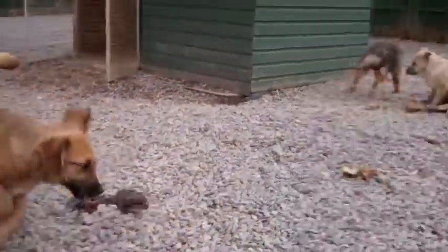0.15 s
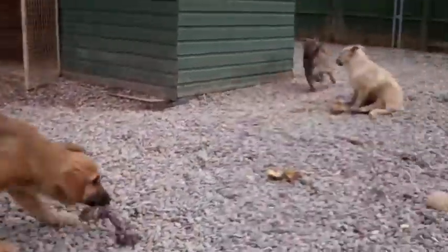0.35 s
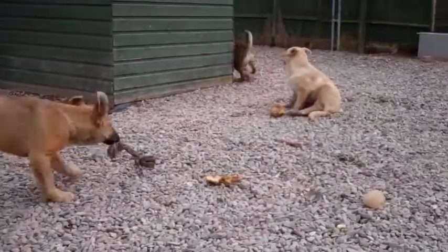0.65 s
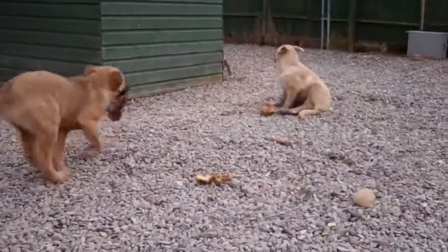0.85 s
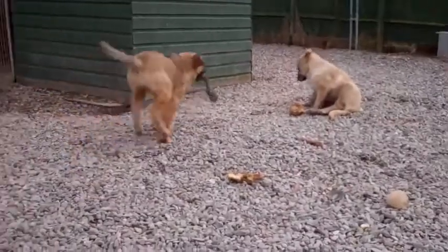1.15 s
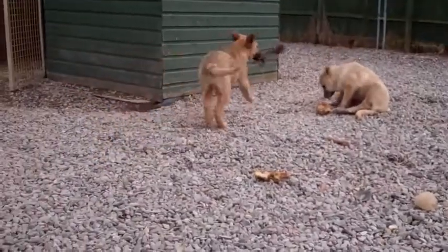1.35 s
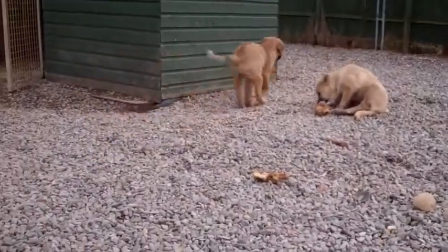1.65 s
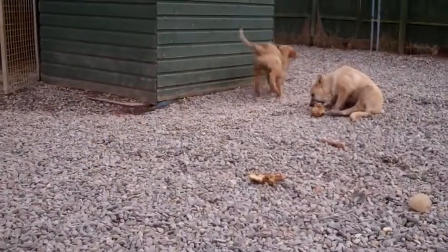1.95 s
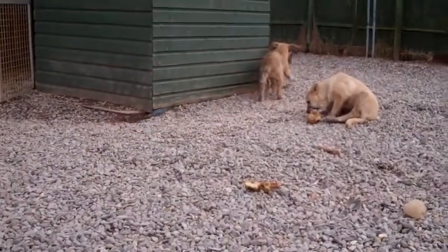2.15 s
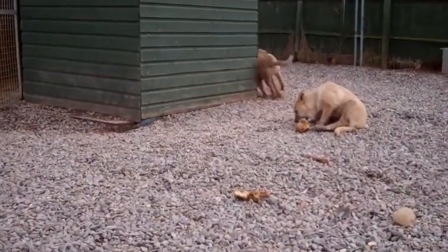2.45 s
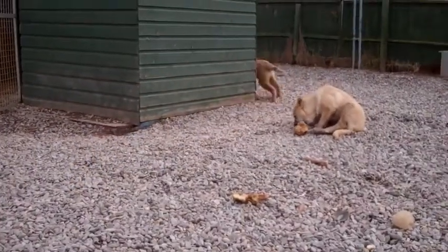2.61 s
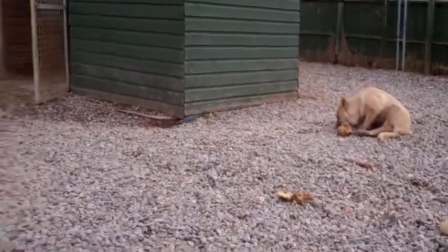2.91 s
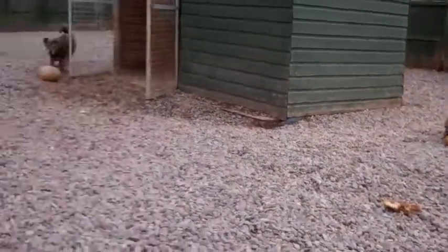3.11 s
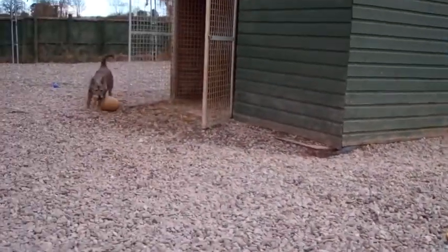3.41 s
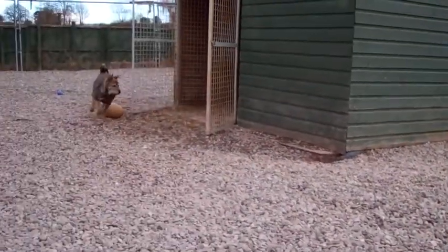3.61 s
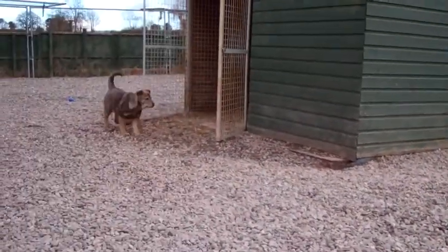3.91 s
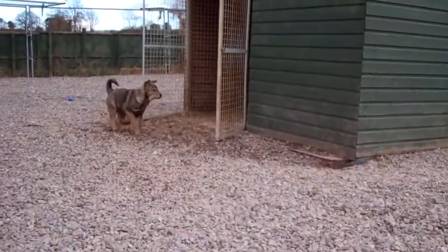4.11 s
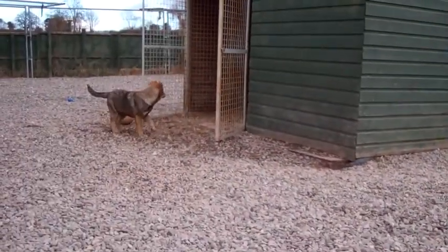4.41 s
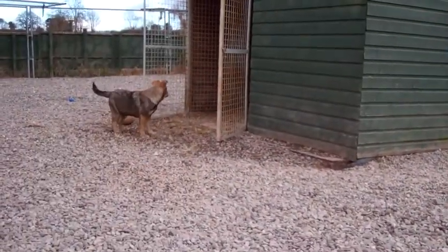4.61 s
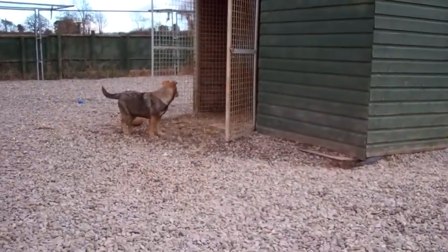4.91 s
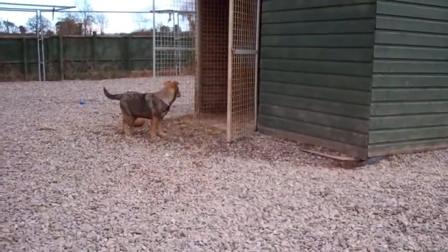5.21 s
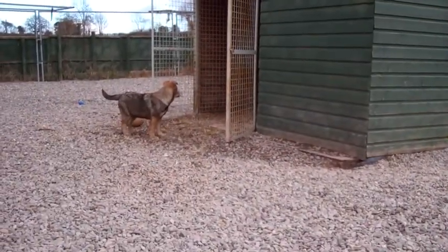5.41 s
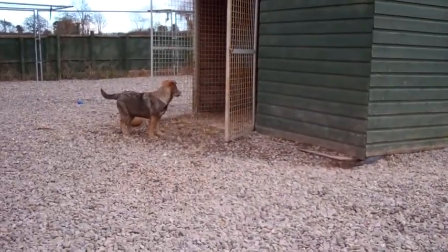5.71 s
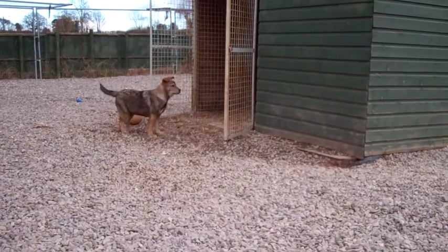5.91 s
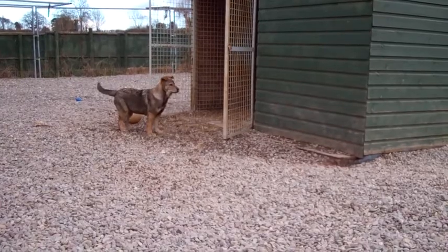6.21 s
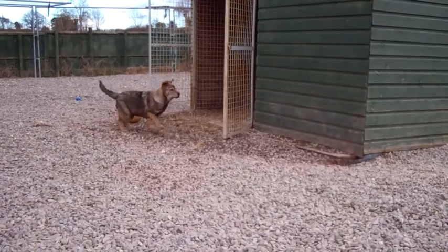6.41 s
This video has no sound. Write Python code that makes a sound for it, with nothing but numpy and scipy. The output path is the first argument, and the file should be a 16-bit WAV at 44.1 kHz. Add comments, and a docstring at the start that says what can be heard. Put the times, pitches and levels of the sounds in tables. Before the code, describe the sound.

Outdoor stereo microphone in a kennel yard: irregular light paw crunches on loose stones with crisp pebble clicks, densest just before four seconds. Then the gravel settles to faint shuffling and a puppy's thin, piercing whistle-like whines come forward, broken by a single loud yelp, small closed-mouth whimpers and cracked squeaks. Soft knocks near the shed, slight wall reflections and a low distant hush. A couple of paw steps return at the end.

```python
"""A fenced kennel yard on gravel: puppies trot and scuffle; each paw crunches the stones and flicks a few loose.
Then, off to one side, one pup whines in thin nasal whistles, with a yelp, short whimpers and broken squeaks.
Shed and fence answer the voice; a few dull bumps and a quiet outdoor hush lie underneath.
Stones are noise and short decaying ticks; the voice is sines, with resonances and a rush of air for the yelp.
"""
import sys
import numpy as np
from scipy import signal
from scipy.fft import rfft, irfft, next_fast_len
from scipy.io import wavfile
from scipy.ndimage import map_coordinates

SR = 44100
rng = np.random.default_rng(int(sys.argv[2]) if len(sys.argv) > 2 else 0)


def output_pcm(signal):
    """Save a mono or channel-first signal as 16-bit PCM at the path in sys.argv[1].

    Samples are clipped to [-1, 1] before scaling.
    """
    pcm = np.clip(np.atleast_2d(signal).T, -1, 1) * 32767
    wavfile.write(sys.argv[1], SR, np.round(pcm).astype(np.int16))


N = 288855
T = np.arange(N) / SR

# Outdoor background before the trim below: time_s [s], level_db [dB]
HUSH_LEVEL = [(0.12, -75.5), (0.92, -78), (1.11, -70), (1.75, -66.5), (1.8, -75), (1.89, -75.5),
              (1.95, -68), (3.69, -65), (4.76, -68.5), (5.08, -64), (6.5, -66)]
# Colour of the distant rumble and air: frequency_hz [Hz], density_db [dB per Hz]
HUSH_COLOUR = [(15, -19), (25, -10.5), (59, -1), (124, -10), (417, -7.5), (728, -9.5), (818, -8),
               (1050, -9.5), (1160, -10.5), (1980, -9.5), (2500, -13.5), (3250, -12), (5500, -120)]
# Dull knocks: start_s [s], level_db [dB], centre_hz [Hz], length_s [s]
KNOCKS = [(1.373, -35, 2070, 0.0062), (1.374, -46, 755, 0.0066), (1.833, -55, 1750, 0.02),
          (3.212, -50.5, 292, 0.011), (3.252, -55, 290, 0.012), (3.346, -61, 290, 0.044),
          (3.497, -57.5, 285, 0.068), (3.553, -55, 96, 0.072), (4.009, -47.5, 720, 0.02),
          (4.89, -54, 84.4, 0.12), (4.914, -55, 208, 0.037), (4.982, -58, 143, 0.17),
          (5.331, -47.5, 356, 0.051), (5.402, -56.5, 363, 0.072), (5.614, -65, 140, 0.076)]
# Firmer paw falls: start_s [s], level_db [dB], length_s [s], rise_s [s]
PAW_FALLS = [(.002, -44.5, 0.034, 0.0019), (.146, -46.5, 0.065, 0.0066), (0.318, -45.5, .019, 0.0035),
             (.358, -42.5, 0.031, 0.0031), (0.44, -50, 0.061, .008), (0.518, -48, 0.075, .003),
             (0.656, -48.5, 0.042, 0.0047), (0.724, -47.5, 0.023, 0.0032), (0.908, -44.5, 0.11, 0.0035),
             (1.03, -46, 0.052, 0.0047), (1.117, -45, 0.044, 0.0063), (1.292, -38.5, 0.054, .012),
             (1.427, -42.5, 0.051, .005), (1.528, -44, .045, 0.0037), (1.6, -49.5, .056, 0.007),
             (1.684, -39, 0.056, 0.024), (1.721, -35.5, 0.044, .006), (1.823, -47.5, 0.045, 0.0054),
             (1.933, -46.5, 0.1, 0.0042), (2.057, -44.5, 0.032, 0.0017), (2.135, -49.5, .13, 0.0022),
             (2.257, -42, 0.076, 0.007), (2.521, -46, 0.09, .005), (2.554, -39.5, 0.06, 0.014),
             (2.665, -49.5, 0.081, .003), (2.891, -48, 0.13, 0.0034), (3.138, -43, 0.039, 0.0044),
             (3.301, -48, 0.075, 0.0044), (3.373, -40.5, 0.063, .016), (3.455, -44, 0.11, .006),
             (3.563, -42, 0.089, 0.0081), (3.7, -45.5, 0.094, 0.011), (3.781, -37.5, 0.14, 0.021),
             (3.851, -39, 0.051, 0.0051), (3.891, -37, 0.047, 0.013), (4.084, -41, 0.034, 0.0066),
             (4.12, -39.5, 0.021, 0.0043), (4.19, -44, .016, 0.0043), (4.24, -41.5, .081, 0.0044),
             (5.895, -48, 0.031, 0.0058), (6.422, -46, 0.11, 0.013), (6.48, -45, .25, 0.013)]
# Light shuffling all over the yard: time_s [s], level_db [dB]
SHUFFLE_LEVEL = [(0.05, -52.5), (0.43, -52), (0.79, -58.5), (0.97, -60.5), (1.11, -54), (2.11, -58),
                 (3.0, -56.5), (3.75, -54.5), (3.93, -67), (4.22, -51), (4.33, -54.5), (4.61, -59),
                 (5.15, -58), (6.5, -54)]
# The packed layer sounds more where the loose cover is thin: time_s [s], gain_db [dB]
THIN_COVER_GAIN = [(0, -8.5), (.9, -9.5), (1.4, -5), (1.8, -21), (2.9, -39), (3.5, -5), (3.85, -5.5),
                   (4.1, -8.5), (6.5, -5)]
# Colour given to loose stones: frequency_hz [Hz], gain_db [dB]
LOOSE_COLOUR = [(880, -17.5), (1500, -10.5), (2040, -6.5), (2220, -5.5), (2830, -4), (3260, -4.5),
                (3550, -1.5), (5110, -2), (8630, 0.5), (9380, -3.5), (13000, -26), (14000, -40)]
# Colour given to packed stones below: frequency_hz [Hz], gain_db [dB]
PACKED_COLOUR = [(150, -34), (500, -5.5), (1200, -4), (2000, -8.5), (3200, -4), (6000, -25)]
# Lean of the gravel to the left: frequency_hz [Hz], left_minus_right_db [dB]
GRAVEL_LEAN = [(1500, 3), (4000, 2), (7400, 9), (10000, 10.5), (13000, -4)]
# Left-right likeness of the gravel: frequency_hz [Hz], likeness [0..1]
GRAVEL_LIKENESS = [(1300, 1), (3000, 0.69), (6000, 0.086), (12000, 0.12)]
# Loudest single stones: start_s [s], level_db [dB, first instant at the left], pitch_hz [Hz], t60_s [s]
LOUD_STONES = [(.089, -39, 9000, .012), (.182, -32.5, 8400, .008), (.296, -41, 8000, .006),
               (.316, -37, 7500, .015), (.362, -34, 9300, .02), (.378, -32.5, 8500, .025),
               (.427, -41, 7150, .008), (.511, -35, 8700, .025), (.563, -36, 9200, .014),
               (.666, -32, 7100, .016), (.917, -34.5, 7400, .025), (.992, -41, 7500, .012),
               (1.025, -35, 7200, .012), (1.080, -33, 8900, .009), (1.108, -40, 8450, .007),
               (1.302, -36, 6700, .015), (1.375, -30, 8000, .013), (1.526, -29.5, 6100, .01),
               (1.647, -40, 8000, .008), (1.726, -30, 4500, .012), (1.743, -27.5, 7300, .035),
               (1.819, -37.5, 8900, .01), (1.840, -37, 8000, .008), (1.939, -38, 7500, .016),
               (2.001, -40, 8000, .012), (2.056, -36, 8000, .014), (2.072, -36, 7000, .014),
               (2.135, -35, 7200, .01), (2.393, -28.5, 7800, .012), (2.476, -42, 7850, .014),
               (2.521, -39, 8000, .01), (2.667, -37, 8800, .012), (2.895, -41, 8300, .012),
               (3.515, -36, 9100, .012), (3.864, -31, 7500, .04), (3.929, -31.5, 9000, .035),
               (4.248, -31.5, 7800, .02), (4.307, -38, 8300, .02), (4.411, -42, 8300, .007),
               (4.946, -43, 9000, .012), (5.663, -43, 7000, .009), (6.065, -43, 5000, .005),
               (6.105, -41, 6000, .007), (6.167, -37.5, 6900, .004)]
# Nasal whistles, one course each: time_s [s], pitch_hz [Hz], level_db [dB], octave_db [dB]
WHINE_COURSES = [
    [(3.99, 4330, -47, -68), (4.02, 4340, -44, -66), (4.085, 4330, -46, -62), (4.13, 4345, -46, -59),
     (4.185, 4330, -50, -62)],
    [(4.66, 4010, -59, -62), (4.735, 4160, -58, -53), (4.77, 4180, -60, -62)],
    [(5.06, 3860, -52, -53), (5.085, 3990, -46, -62), (5.118, 3980, -50, -60)],
    [(5.122, 4290, -50, -51), (5.135, 4235, -42.5, -40), (5.165, 4120, -49, -50), (5.19, 4060, -52, -51),
     (5.255, 4005, -51, -54), (5.3, 4068, -51, -45), (5.33, 4072, -51, -44), (5.36, 4070, -52, -48),
     (5.382, 3920, -54, -50), (5.398, 3450, -70, -52)],
    [(5.592, 3800, -51, -66), (5.63, 3890, -41.5, -47), (5.67, 3990, -45, -55), (5.735, 4090, -42, -49),
     (5.78, 4110, -44.5, -49), (5.825, 4107, -52, -55), (5.87, 4104, -43, -53), (5.94, 4080, -46, -58),
     (5.98, 4050, -49, -60), (6.0, 3800, -62, -58)],
    [(6.21, 3740, -48, -62), (6.23, 3790, -41, -56), (6.277, 3950, -46, -59), (6.286, 4015, -36, -53),
     (6.33, 4005, -41, -60), (6.375, 4000, -48, -55), (6.41, 4046, -43, -50), (6.46, 4064, -47.5, -58),
     (6.545, 4030, -49, -61)],
]
# Broken squeaks: start_s [s], length_s [s], first_hz [Hz], last_hz [Hz], level_db [dB], octave_db [dB]
BROKEN_SQUEAKS = [(4.585, .045, 3870, 3910, -64, -56), (4.836, .02, 3480, 3600, -55, -45),
                  (5.005, .055, 3420, 3340, -55, -70), (5.14, .035, 3480, 3420, -56, -72),
                  (5.395, .022, 3320, 3480, -54, -46), (5.42, .04, 3340, 3420, -54, -70),
                  (5.485, .03, 3380, 3460, -55, -70), (5.512, .11, 5460, 5340, -52, -80),
                  (5.998, .026, 3340, 3470, -51, -41), (6.03, .1, 3440, 3380, -52, -70),
                  (6.525, .025, 3480, 3560, -58, -45)]
# Course of the yelp: time_s [s], pitch_hz [Hz], level_db [dB], overtones_db [dB, strength of the overtones]
YELP_COURSE = [(4.443, 794, -32.5, 13), (4.452, 883, -25, 3), (4.471, 944, -20.5, -12),
               (4.488, 1004, -35, 8.5), (4.5, 1022, -32, 7), (4.516, 1007, -20, -2), (4.54, 1011, -38, -15),
               (4.575, 966, -38, -2), (4.61, 938, -54.5, 15)]
# Short closed-mouth cries: start_s [s], length_s [s], first_hz [Hz], last_hz [Hz], level_db [dB]
WHIMPER_CRIES = [(4.781, 0.031, 939, 876, -41.5), (4.826, 0.022, 755, 605, -48),
                 (5.579, 0.026, 690, 665, -56.5), (5.906, 0.067, 923, 864, -37.5),
                 (5.978, 0.0206, 740, 585, -40.5), (6.438, 0.051, 896, 844, -35)]
# Resonances of the open mouth: frequency_hz [Hz], gain_db [dB]
OPEN_MOUTH = [(900, 0), (1400, -26), (1750, -19), (1960, -5), (2080, -4), (2500, -36), (3100, -27),
              (3700, -17), (4200, -30), (5200, -27), (6200, -30), (7200, -38), (9000, -42)]
# Resonances of the closed mouth: frequency_hz [Hz], gain_db [dB]
CLOSED_MOUTH = [(900, 13), (1300, -12), (1800, -22.5), (2700, -23), (4400, -12), (5400, -13), (7200, -17),
                (9000, -69)]
# Slaps from shed and fence: delay_s [s], gain_db [dB]
WALL_SLAPS = [(.021, -7.5), (.038, -12.5), (.083, -18.5), (0.138, -64)]
# Decay of the diffuse tail: frequency_hz [Hz], t60_s [s]
YARD_DECAY = [(200, 0.46), (1000, 1.28), (2000, 1.25), (4000, .9), (10000, 0.6)]

HUSH_TRIM_DB, HUSH_SWING_DB = 6.5, .62
SHUFFLE_SWING_DB = .36
# packed-layer level in dB = PACKED_DB + PACKED_GROWS * paw level: it yields less than loose stones
PACKED_DB, PACKED_GROWS = -23, .51
CRUNCH_DB = -1.9  # loose top stones against the paw's level
SETTLE_DB, SETTLE_S = -10, .07  # stones settling after each paw, against its level
INSTANT_S = .002  # span over which a click's level is set
FLICKS_PER_PAW, FLICK_SPREAD_DB = 3, 1.5
STRAY_PER_S, STRAY_DB = 4, -46  # fainter pebbles rolling over at random
STONE_HZ, STONE_SPREAD, STONE_T60_S = 7000, .28, .01  # flicked and stray pebbles; spread is relative
TREMBLE, START_TREMBLE = .0011, 1.3  # whistle pitch unsteadiness, extra multiple of it at the start
STEADY_S = .08  # time constant of calming down
BREAK_SHARE, BREAK_PER_S = .3, 200  # depth and speed of the ragged start's stutter
FLUTTER_DB, WHINE_EDGE_S = 1.7, .008
SQUEAK_WAVER, SQUEAK_BREAK_DB = .006, 3.5  # relative pitch waver, break-up of the level
YELP_BREATH_DB, YELP_GRIT = -36, .18  # air in the throat, unevenness of the overtones
WHIMPER_SWELL = .84  # the higher, the more pointed the swell
CRY_LAG_S, WHINE_LAG_S = .000124, .000092  # how much later the left microphone hears the voice
TAIL_DB = -18.5
TOP_HZ = 14200


def amp(db):
    """Turn decibels into gain."""
    return 10 ** (np.asarray(db) / 20)


def unit(x):
    """Scale to rms 1."""
    return x / np.sqrt(np.mean(x ** 2) + 1e-20)


def along(points, hz):
    """Read (Hz, value) points on a log frequency axis."""
    f, v = np.transpose(points)
    return np.interp(np.log(hz + 1), np.log(f + 1), v)


def curves(rows):
    """Give one value per sample for each column after the time."""
    s, *cols = np.transpose(rows)
    return [np.interp(T, s, c) for c in cols]


def wobble(rate):
    """Draw a smooth random curve with rate knots a second."""
    return map_coordinates(rng.standard_normal(int(N * rate / SR) + 4), [T * rate])


def filtered(x, response):
    """Multiply the spectrum of x by a response of frequency."""
    m = next_fast_len(N + SR // 2)
    return irfft(rfft(x, m) * response(np.fft.rfftfreq(m, 1 / SR)), m)[..., :N]


def panned(x, pan_db):
    """Make the left louder than the right by pan_db."""
    return x * amp(np.array([[pan_db], [-pan_db]]) / 2)


def spread(pair, spectrum, alike, pan):
    """Turn two unrelated signals into a coloured stereo pair whose middle has rms 1."""
    def turn(hz):
        return np.arccos(np.clip(along(alike, hz), -1, 1)) / 2

    def colour(hz):
        return amp(along(spectrum, hz)) * [np.cos(turn(hz)), np.sin(turn(hz))]

    mid, side = filtered(pair, colour)
    out = np.array([mid + side, mid - side])
    out = filtered(out, lambda hz: amp(np.outer([1, -1], along(pan, hz)) / 2))
    return out / out.mean(0).std()


def push(s, length, attack):
    """Shape one contact: a quick rise, a short hold and a fall."""
    length, out = max(length, .005), np.zeros(N)
    on = (T > s) & (T < s + 5 * length)
    t = T[on] - s
    out[on] = (1 - np.exp(-t / attack)) * np.exp(-(t / length) ** 1.5)
    return out


def gate(rows, fade):
    """Open from the first row to the last, with soft edges."""
    opening = np.clip((T - rows[0][0]) / fade + .5, 0, 1)
    closing = np.clip((rows[-1][0] - T) / fade + .5, 0, 1)
    return opening * closing


def hush():
    """Distant outdoor rumble and air: wide coloured noise on a set course with sudden dips and a slight swing."""
    noise = rng.standard_normal((2, N))
    air = spread(noise, HUSH_COLOUR, alike=[(60, .73), (1000, .26)], pan=[(60, 2.2), (1000, 2.4)])
    level_db = curves(HUSH_LEVEL)[0] + HUSH_TRIM_DB + HUSH_SWING_DB * wobble(7)
    return amp(level_db) * air


def bumps():
    """Soft, toneless knocks from around the shed: short pushes of noise in a band around each centre."""
    out = np.zeros(N)
    for s, db, centre, length in KNOCKS:
        body = signal.butter(3, [centre / 1.35, centre * 1.35], "band", fs=SR, output="sos")
        thud = unit(signal.sosfilt(body, rng.standard_normal(N)))
        out += amp(db) * push(s, length, attack=.0016) * thud
    return panned(out, pan_db=2.5)


def contacts(rate, scatter_db, wash):
    """Pebbles of random size tick together, each with its own pitch and place, over a wash of tiny ones."""
    count = int(rate * N / SR)
    start, t = rng.integers(N, size=(count, 1)), np.arange(160) / SR
    pitch = np.exp(rng.uniform(np.log(1500), np.log(13000), (count, 1)))
    cycles = rng.uniform(.4, 2.6, (count, 1))  # stone hardly rings
    size = amp(scatter_db * np.clip(rng.standard_normal((count, 1)), -2, 1.4)) * pitch
    tick = size * np.exp(-t * pitch / cycles) * np.sin(2 * np.pi * pitch * t)
    where = (start + np.arange(len(t))).ravel()
    place = rng.uniform(0, 2 * np.pi, (count, 1))
    sides = (np.cos(place), np.sin(place))
    pair = np.array([np.bincount(where, (tick * side).ravel(), N)[:N] for side in sides])
    return unit(pair) + wash * rng.standard_normal((2, N))


def gravel():
    """Paws grind the top stones and the packed layer below, and leave stones settling behind them."""
    # powers add up where paws overlap
    top, below = np.zeros(N), np.zeros(N)
    loose = amp(curves(SHUFFLE_LEVEL)[0] + SHUFFLE_SWING_DB * wobble(14)) ** 2
    for s, db, length, rise in PAW_FALLS:
        press = push(s, length, attack=rise)
        top += (amp(db) * press) ** 2
        below += (amp(PACKED_DB + PACKED_GROWS * db) * press) ** 2
        loose += (amp(db + SETTLE_DB) * push(s, SETTLE_S, attack=rise)) ** 2

    def stones(source, spectrum):
        return spread(source, spectrum, GRAVEL_LIKENESS, GRAVEL_LEAN)

    crunch = stones(contacts(rate=2000, scatter_db=4.8, wash=.7), LOOSE_COLOUR)
    grind = stones(contacts(rate=2000, scatter_db=4, wash=.8), PACKED_COLOUR)
    settle = stones(contacts(rate=1300, scatter_db=5, wash=1.6), LOOSE_COLOUR)
    jolts = amp(.7 * wobble(70))  # the stones give way in small jerks
    top_layer = amp(CRUNCH_DB) * np.sqrt(top) * crunch
    packed_layer = amp(curves(THIN_COVER_GAIN)[0]) * np.sqrt(below) * grind
    return jolts * (top_layer + packed_layer) + np.sqrt(loose) * settle


def pebbles():
    """Draw further stones: a few flicked after each paw's rise, and faint strays at random."""
    hits = [(rng.uniform(0, N / SR), STRAY_DB) for _ in range(int(STRAY_PER_S * N / SR))]
    for s, db, length, rise in PAW_FALLS:
        for _ in range(FLICKS_PER_PAW):
            hits.append((s + rise + length * rng.uniform() ** 2, db))
    drawn = []
    for s, db in hits:
        pitch = STONE_HZ * np.exp(STONE_SPREAD * rng.standard_normal())
        drawn.append((s, rng.normal(db, FLICK_SPREAD_DB), pitch, STONE_T60_S))
    return drawn


def stone_clicks():
    """A pebble strikes, rings for a few milliseconds around its own pitch and rebounds once."""
    out, t = np.zeros((2, N + SR)), np.arange(2048) / SR
    hz = np.fft.rfftfreq(len(t), 1 / SR)
    for s, db, pitch, t60 in LOUD_STONES + pebbles():
        rebound = t - rng.uniform(.0015, .004)
        blow = amp(-60 * t / t60) + .3 * (rebound > 0) * amp(-60 * np.abs(rebound) / t60)
        resonance = .067 + 1 / (1 + 4j * (hz - pitch) / pitch)
        colour = amp(along(LOOSE_COLOUR, hz)) * resonance
        shared, own = rng.standard_normal(len(t)), rng.standard_normal((2, len(t)))
        burst = np.roll(blow * (shared + own), 16, axis=1)
        click = panned(irfft(rfft(burst) * colour), pan_db=9)
        first_instant = click[0, :int(INSTANT_S * SR)].std()
        out[:, round(s * SR):][:, :len(t)] += amp(db) * click / first_instant
    return out[:, :N]


def whistle(pitch, db, octave_db):
    """A thin tone through the nose, with its octave."""
    phase = 2 * np.pi * np.cumsum(pitch) / SR
    return np.sqrt(2) * (amp(db) * np.sin(phase) + amp(octave_db) * np.sin(2 * phase))


def squeaks():
    """Faint whistles that never lock in: they bend, waver and break up."""
    waver = SQUEAK_WAVER * wobble(130)
    breaks = unit(amp(SQUEAK_BREAK_DB * wobble(110)))
    out = np.zeros(N)
    for s, length, first_hz, last_hz, db, octave_db in BROKEN_SQUEAKS:
        on = (T > s) & (T < s + length)
        u = (T[on] - s) / length
        arch = np.sqrt(np.abs(np.sin(np.pi * u)))
        pitch = (first_hz + (last_hz - first_hz) * u) * (1 + waver[on])
        out[on] += arch * whistle(pitch, db, octave_db)
    return breaks * out


def whines():
    """Each long whistle starts ragged, then steadies as it follows its course of pitch and level."""
    tremble = TREMBLE * (wobble(90) + .5 * wobble(600))
    flutter = amp(FLUTTER_DB * wobble(70))
    stutter, out = BREAK_SHARE * wobble(BREAK_PER_S), np.zeros(N)
    for course in WHINE_COURSES:
        edges = gate(course, fade=WHINE_EDGE_S)
        on = edges > 0
        pitch, db, octave_db = (c[on] for c in curves(course))
        ragged = np.exp(-(T[on] - course[0][0]) / STEADY_S)
        pitch = pitch * (1 + tremble[on] * (1 + START_TREMBLE * ragged))
        out[on] += edges[on] * (1 + ragged * stutter[on]) * whistle(pitch, db, octave_db)
    return flutter * out


def cry(pitch, level, bright, tract, jitter, rasp, grit):
    """The vocal folds sound a high note; its rougher overtones pass the mouth's resonances."""
    on, out = level > 0, np.zeros(N)
    pitch, age = pitch[on], T[on] - T[on][:1]

    def shake(rate):
        return map_coordinates(rng.standard_normal(int(rate) + 4), [age * rate])

    phase = 2 * np.pi * np.cumsum(pitch * (1 + jitter * shake(250))) / SR
    overtones = 0
    for k in range(2, 10):
        strength = amp(along(tract, k * pitch)) * (1 + grit * shake(600))
        scramble = rasp * (k - 1) ** .35 * shake(350)  # stronger for higher overtones
        overtones = overtones + strength * np.sin(k * phase + scramble)
    out[on] = np.sqrt(2) * level[on] * (np.sin(phase) + bright[on] * overtones)
    return out


def whimpers():
    """Each closed-mouth cry swells and fades in one arch while its pitch glides."""
    out = np.zeros(N)
    for s, length, first_hz, last_hz, db in WHIMPER_CRIES:
        u = np.clip((T - s) / length, 0, 1)
        level = amp(db) * (4 * u * (1 - u)) ** WHIMPER_SWELL
        pitch = first_hz + (last_hz - first_hz) * u
        out += cry(pitch, level, np.ones(N), CLOSED_MOUTH, jitter=.006, rasp=.17, grit=0)
    return out


def yelp():
    """One loud, raspy cry whose overtones come and go, over a rush of air."""
    pitch, db, bright_db = curves(YELP_COURSE)
    level = amp(db) * gate(YELP_COURSE, fade=.004)
    throat = signal.butter(2, [1500, 4800], "band", fs=SR, output="sos")
    air = amp(YELP_BREATH_DB) * unit(signal.sosfilt(throat, rng.standard_normal(N)))
    voice = cry(pitch, level, amp(bright_db), OPEN_MOUTH, jitter=.005, rasp=.2, grit=YELP_GRIT)
    return voice + level * air


def ports(x, lag):
    """Sound from the side reaches the left microphone lag seconds after the right."""
    return filtered(x, lambda hz: np.exp(1j * np.pi * np.outer([-1, 1], hz) * lag))


def yard(x):
    """A thin diffuse tail of noise in which each frequency dies at its own speed."""
    hz, t, z = signal.stft(rng.standard_normal((2, SR)), SR, nperseg=256)
    decay = amp(-60 * t / along(YARD_DECAY, hz)[:, None])
    tail = signal.istft(z * decay, SR, nperseg=256)[1]
    tail = tail / np.linalg.norm(tail[0])
    delayed = np.pad(x, (900, 0))[None]  # 900 samples before the tail begins
    return signal.fftconvolve(delayed, tail, axes=1)[:, :N]


def puppy():
    """The pup stands off to one side; shed and fence slap its voice back from ahead."""
    cries, whistles = yelp() + whimpers(), whines() + squeaks()
    direct = ports(cries, CRY_LAG_S) + ports(whistles, WHINE_LAG_S)
    voice = cries + whistles

    def walls(hz):
        return sum(amp(db) * np.exp(-2j * np.pi * hz * delay) for delay, db in WALL_SLAPS)

    slaps = filtered(voice, walls)  # same arrival time at both microphones
    return panned(direct + slaps + amp(TAIL_DB) * yard(voice), pan_db=3.5)


def scene():
    """Everything in the yard, from the background to the pup."""
    return hush() + bumps() + gravel() + stone_clicks() + puppy()


def record(dry):
    """The recorder keeps nothing above its band limit."""
    return filtered(dry, lambda hz: hz < TOP_HZ)


dry = scene()
out = record(dry)
output_pcm(out)
```